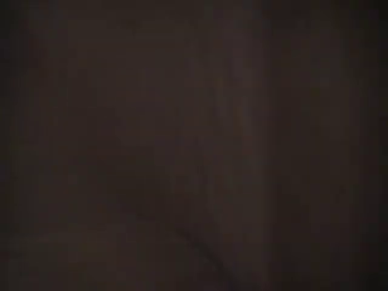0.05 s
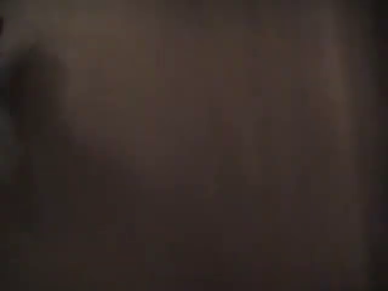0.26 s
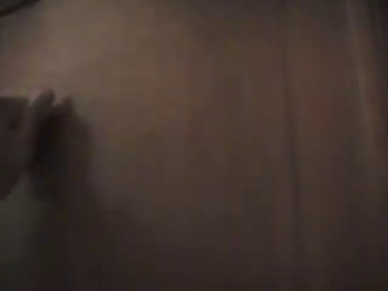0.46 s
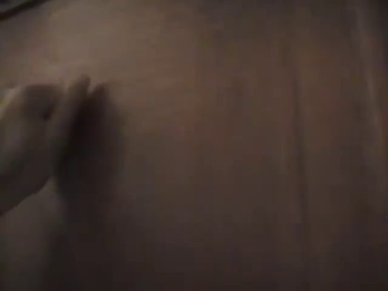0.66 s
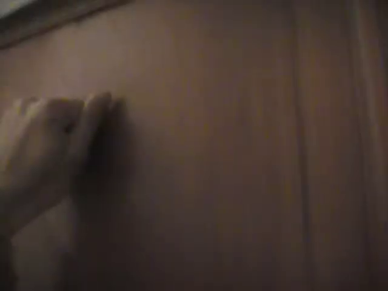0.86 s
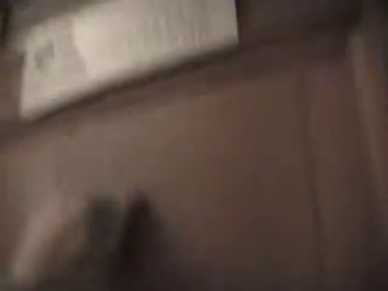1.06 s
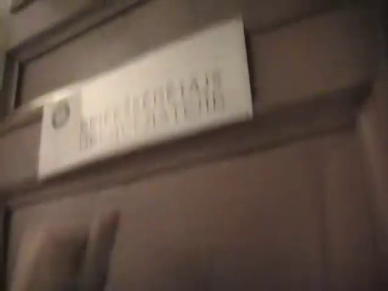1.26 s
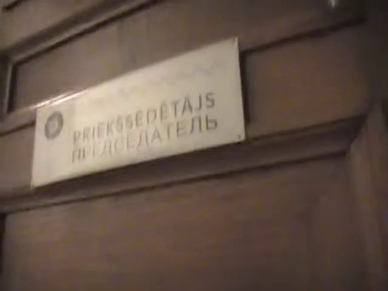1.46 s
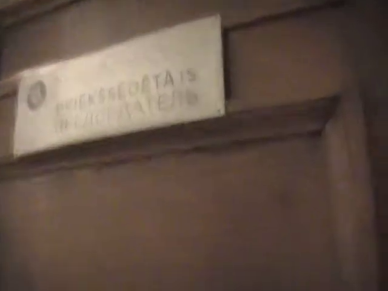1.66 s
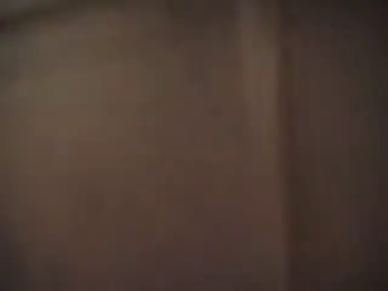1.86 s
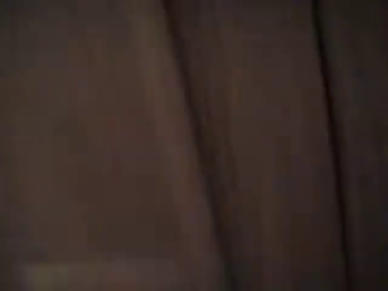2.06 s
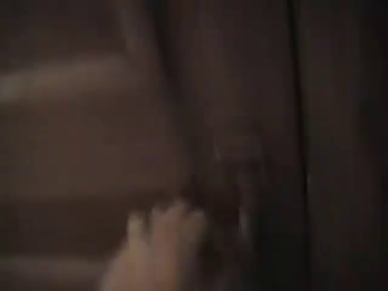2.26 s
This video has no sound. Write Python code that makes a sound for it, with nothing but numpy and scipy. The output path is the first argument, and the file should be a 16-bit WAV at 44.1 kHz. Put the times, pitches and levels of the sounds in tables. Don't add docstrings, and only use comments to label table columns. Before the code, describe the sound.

Five quick, woody knocks ring through a hard corridor, then a short pause with a soft shoe scuff, a sharp handle click, the door bumping in its frame, and a final metallic rattle, heard close with low air noise.

```python
import sys
import numpy as np
from scipy import signal
from scipy.fft import rfft, irfft, next_fast_len
from scipy.io import wavfile
from scipy.ndimage import uniform_filter1d

SR = 44100
rng = np.random.default_rng(int(sys.argv[2]) if len(sys.argv) > 2 else 0)


def voltage_ratio(decibels):
    exponent = np.asarray(decibels, float) / 20
    return 10 ** exponent


def dump(signal):
    limited = np.clip(np.atleast_2d(signal).T, -1, 1)
    pcm = np.round(limited * 32767).astype(np.int16)
    wavfile.write(sys.argv[1], SR, pcm)


N = 101253
PRE = 4410
M = N + PRE
FFT_SIZE = next_fast_len(2 * M)
F = np.fft.rfftfreq(FFT_SIZE, 1 / SR) + 1e-6


def shape(x, gain):
    return irfft(rfft(x, FFT_SIZE) * gain, FFT_SIZE)[..., :M]


def logf(table):
    hz, value = np.array(table, float).T
    return np.interp(np.log(F), np.log(hz), value)


def band(hz, width):
    return 1 / (1 + ((F - hz * hz / F) / width) ** 2)


def unit(x):
    return x / np.sqrt(np.mean(x ** 2))


def smooth_noise(size):
    return unit(uniform_filter1d(rng.standard_normal(M), size=size))


# (frequency [Hz], share of unrelated sound left and right [0-1])
DECORRELATION = [(60, 0.44), (200, 0.15), (500, 0.52), (1500, 0.69), (10000, 1)]


def wide(gain):
    middle, side = rng.standard_normal((2, M))
    side = shape(side, gain * np.clip(logf(DECORRELATION), 0, 1))
    return shape(middle, gain) + side * np.array([[1], [-1]])


def ring(modes, gains, seconds=0.44, damp=0.91):
    detune = 0.021
    hz, db, t60 = np.array(modes, float).T[:, :, None]
    hz = hz * (1 + detune * rng.standard_normal(hz.shape))
    t = np.arange(int(seconds * SR)) / SR
    decay = voltage_ratio(db - 60 * t / (t60 * damp))
    return (np.asarray(gains)[:, None] * decay * np.sin(2 * np.pi * hz * t)).sum(axis=0)


def add(out, s, x):
    i = max(int(round(s * SR)) + PRE, 0)
    x = x[:M - i]
    out[i:i + len(x)] += x


def push(ms):
    u = np.arange(200) / SR * 6000 / ms
    force = u ** 2 * np.exp(-u)
    return force / force.sum()


# (frequency [Hz], density [dB per Hz])
AIR_SPECTRUM = [(25, -8), (60, 1.5), (71, -10), (153, -9.5), (437, -6), (1910, -18.5), (2050, -19),
                (10300, -37), (16000, -52)]
# (time [s], level [dB])
RUMBLE_LEVEL = [(0, -42.5), (.5, -44), (1, -42), (1.5, -49), (1.9, -59), (2.29, -64)]
# (time [s], level [dB])
RUSTLE_LEVEL = [(0, -68), (.1, -62), (.3, -69), (.7, -75), (1.05, -66), (1.3, -59.5), (1.5, -59),
                (1.65, -61.5), (1.82, -58), (2.1, -60.5), (2.29, -62)]


def background():
    rumble_hz, rumble_width_hz, rumble_noise_db = 44, 5.6, -10
    rustle_hz, rustle_width_hz, rustle_db = 10500, 6000, -1.5
    t = (np.arange(M) - PRE) / SR

    def course(table):
        return voltage_ratio(np.interp(t, *np.array(table).T))

    air = unit(wide(voltage_ratio(logf(AIR_SPECTRUM)) * (F > 20))) * voltage_ratio(-51.5)

    drift = 1 + 0.035 * smooth_noise(8000)
    hum = np.sin(2 * np.pi * np.cumsum(rumble_hz * drift) / SR)
    rumble_noise = voltage_ratio(rumble_noise_db) * unit(wide(band(rumble_hz, rumble_width_hz)))
    rumble = (hum + rumble_noise) * course(RUMBLE_LEVEL)

    flicker = voltage_ratio(smooth_noise(1500))
    rustle = unit(wide(band(rustle_hz, rustle_width_hz))) * flicker * voltage_ratio(rustle_db)
    return air + rumble + rustle * course(RUSTLE_LEVEL)


# (centre frequency [Hz], level [dB], decay time t60 [s])
ROOM_BANDS = [(93, -7, 1.15), (219, 0, 1), (600, -5.5, 1.05), (1254, -1.5, 0.96), (2330, -5, 1.06),
              (4000, -10.5, 0.98), (8800, -14.5, 0.43)]


def corridor():
    room_db, early_db, early_t60_s, build_ms = -8, 3.5, 0.062, 1.7
    t = np.arange(M) / SR
    early = voltage_ratio(early_db - 60 * t / early_t60_s)
    centres = np.log(np.array(ROOM_BANDS)[:, 0])
    out = 0
    for k, (hz, db, t60) in enumerate(ROOM_BANDS):
        share = np.interp(np.log(F), centres, np.arange(len(ROOM_BANDS)) == k)
        out = out + voltage_ratio(db) * wide(np.sqrt(share)) * (voltage_ratio(-60 * t / t60) + early)
    build_up = 1 - np.exp(-t * 1000 / build_ms)
    return out * build_up * voltage_ratio(room_db) * 0.03


# (time [s], length [s], level [dB], centre [Hz], width
# [Hz])
RUBS = [(1.412, 0.016, -40.5, 570, 400), (1.435, 0.053, -39, 516, 470), (1.431, 0.048, -49, 3460, 5950),
        (1.44, 0.11, -58, 4170, 900), (1.472, 0.14, -62, 5000, 5100), (1.722, 0.21, -60.5, 4000, 5000),
        (1.88, 0.02, -42, 4900, 6000), (1.8327, 0.002, -40, 10500, 9440), (1.887, 0.14, -51.5, 4940, 8000),
        (1.888, 0.13, -45.5, 720, 487), (2.198, 0.04, -49.5, 10500, 7900), (2.222, 0.11, -48.5, 8400, 7300),
        (2.24, 0.032, -50.5, 4540, 3400), (2.242, 0.069, -56, 10500, 3000)]


def scuffs():
    out, t = np.zeros(M), (np.arange(M) - PRE) / SR
    for s, length, db, hz, width in RUBS:
        grit = voltage_ratio(2.5 * smooth_noise(150))
        u = (t - s) / length
        envelope = np.clip(u * 20, 0, 1) * np.clip(1.5 - u * 1.12, 0, 1)
        out += voltage_ratio(db) * unit(shape(rng.standard_normal(M), band(hz, width))) * grit * envelope
    return out


# (time [s], level [dB], frequency [Hz], decay time t60 [s])
SETTLING = [(.0298, -44, 9500, .003), (.733, -46, 2700, 0.033), (.925, -46, 2700, 0.017),
            (1.886, -26, 777, 0.084), (1.8975, -24, 712, 0.083), (1.898, -28, 274, 0.14),
            (1.908, -25.5, 129, .09), (1.934, -27, 144, .08), (1.935, -33.5, 300, 0.053),
            (1.966, -29, 152, .07), (1.98, -32, 395, .12), (1.996, -30, 177, 0.085),
            (2.02, -37, 741, 0.051), (2.0423, -42, 3500, 0.0092), (2.1533, -49, 6850, 0.011),
            (2.1945, -40, 213, .05), (2.1981, -24, 206, 0.054), (2.225, -37, 280, .08),
            (2.258, -33.5, 216, 0.12)]


def bumps():
    upper_db, lower_db = -11, -12
    out = np.zeros(M)
    for s, db, hz, t60 in SETTLING:
        modes = [(hz, 0, t60), (hz * 1.31, upper_db, t60), (hz * .78, lower_db, t60)]
        add(out, s, voltage_ratio(db) * ring(modes, [1, 1, 1], .2))
    return out


# (frequency [Hz], level [dB], decay time t60 [s])
DOOR_MODES = [(117.8, -4.5, 0.2), (182.6, 2, 0.053), (240, -3.5, 0.065), (295, -9.5, 0.072),
              (386, -8.5, 0.092), (481.4, -3.5, 0.062), (549, -9, 0.077), (650, -2.5, 0.074),
              (774, -3.5, 0.057), (864.5, 1, 0.055), (1180, 1.5, 0.041), (1448, 5, 0.038), (1930, 2, 0.016),
              (2700, -12, 0.012)]


def door_hit(ms, gains, **decay):
    return np.convolve(ring(DOOR_MODES, gains, **decay), push(ms))


# (time [s], level [dB], rattle length [ms], shock into the door [dB])
HANDLE_SNAPS = [
    (1.877, -13, 0.21, -5.5),
    (1.8787, -9.5, 1.44, -11),
    (1.885, -23.5, 3.53, -2),
    (2.2872, -13.5, 1.4, -24),
    (2.2902, -11.5, 5.8, -8),
]
# (frequency [Hz], level [dB], decay time t60 [s])
HANDLE_MODES = [(1600, -11, 0.012), (2350, -5, 0.026), (3250, -9.5, 0.026), (4030, -10.5, 0.029),
                (4900, 1.5, 0.0072), (6400, -3, 0.024), (7660, -21, 0.02), (9840, 0, 0.029),
                (10560, -11, 0.031), (11740, -8, 0.042), (12800, -4, 0.013), (14130, -18, 0.0084)]


def handle():
    metal_damp, held_damp = 0.36, 0.62
    out, t = np.zeros(M), np.arange(900) / SR
    for s, db, ms, door_db in HANDLE_SNAPS:
        hits = -rng.standard_normal(len(t)) ** 3 * np.exp(-t * 1000 / ms)
        hits[0] = -2
        hits = hits / np.sqrt(np.sum(hits ** 2))
        signs = rng.choice([-1., 1.], len(HANDLE_MODES))
        body = 0.37 * ring(HANDLE_MODES, signs, .1, metal_damp)
        body[:2] = 1.5, .9
        add(out, s, voltage_ratio(db) * np.convolve(hits, body))
        shock = door_hit(0.28, np.ones(len(DOOR_MODES)), seconds=.3, damp=held_damp)
        add(out, s, -voltage_ratio(db + door_db) * 0.31 * shock)
    return out


# (time [s], level [dB], contact [ms], favoured panel region [Hz], knuckle crack [dB])
RAPS = [
    (-.045, 7, 0.56, 600, -33),
    (0.1608, 8.5, 0.53, 386, -17.5),
    (0.3871, 4.5, 0.41, 777, -15.5),
    (0.6112, 4, 0.81, 710, -22),
    (0.7987, 5.5, 0.98, 414, -29.5),
    (1.001, 4, 0.63, 587, -22.5),
]
# (frequency [Hz], level [dB])
SECOND_REGION = [(626, 3.5), (1440, 1), (650, 5), (870, 6), (1080, 9.5), (790, 4.5)]
# (frequency [Hz], level [dB],
# treble [dB])
DAMPED_REGION = [(280, -11, 3), (900, -5.5, 8), (393, -11, 5), (373, -8.5, 2), (185, -9, -8),
                 (334, -9.5, 1.5)]


def knocks():
    focus_db, focus_oct, second_oct, damped_oct, treble_hz = 9.5, 0.49, 0.15, 0.6, 1300
    slap_db, far_db, far_damp = -9, 4, 0.32
    crack_hz, crack_width_hz, crack_ms = 2400, 2120, 0.94
    buzz_hz, buzz_width_hz, buzz_ms, buzz_db = 8500, 7800, 16, -32
    panel, far, cracks, buzzes = np.zeros((4, M))
    t = np.arange(2000) / SR
    mode_hz = np.array(DOOR_MODES)[:, 0]

    def near(hz, octaves):
        return np.exp(-(np.log2(mode_hz / hz) / octaves) ** 2)

    for rap, second, damped in zip(RAPS, SECOND_REGION, DAMPED_REGION):
        s, db, ms, focus_hz, crack_db = rap
        second_hz, second_db = second
        damped_hz, damped_db, treble_db = damped
        reach_db = focus_db * (near(focus_hz, focus_oct) - .5)
        reach_db = reach_db + second_db * near(second_hz, second_oct)
        reach_db = reach_db + damped_db * near(damped_hz, damped_oct)
        reach = voltage_ratio(reach_db + treble_db * (mode_hz > treble_hz))
        add(panel, s, voltage_ratio(db) * 0.26 * door_hit(ms, reach))
        add(far, s, voltage_ratio(db + far_db) * 0.29 * door_hit(ms, reach, damp=far_damp))

        force = push(ms)
        slap = np.convolve(force, np.gradient(force))
        add(panel, s, voltage_ratio(db + slap_db) * slap / slap.max())

        noise, u = rng.standard_normal((2, len(t))), t * 1000 / crack_ms
        add(cracks, s, voltage_ratio(db + crack_db) * noise[0] * 2 * u * np.exp(-u))
        add(buzzes, s, voltage_ratio(db + crack_db + buzz_db) * noise[1] * np.exp(-t * 1000 / buzz_ms))
    cracks = shape(cracks, np.sqrt(band(crack_hz, crack_width_hz)))
    return panel, far, cracks + shape(buzzes, band(buzz_hz, buzz_width_hz))


# (frequency [Hz], left minus right [dB])
PORT_LEAN = [(60, 0.5), (300, 1), (600, 1.5), (1200, 0.5), (2500, 1), (14000, 0)]


def heard(dry, wet, bed, ports):
    low_cut_hz, sub_cut_hz, top_hz, top_steep = 141.7, 93.5, 16000, 60
    low_cut = 1 / (1 - 1j * low_cut_hz / F) ** 3
    sub_cut = 1 / (1 - 1j * sub_cut_hz / F - (sub_cut_hz / F) ** 2) ** 2
    sound = shape(dry + wet, low_cut * sub_cut) + bed
    top_cut = 1 / np.sqrt(1 + (F / top_hz) ** top_steep)
    lean, lead = voltage_ratio(logf(PORT_LEAN) / 2), np.exp(.5j * logf(ports))
    return shape(sound, top_cut * np.array([lean * lead, 1 / (lean * lead)]))


# (frequency [Hz], left lead [radians])
DOOR_PHASE = [(60, 0.14), (500, 0.21), (1200, 0.89), (2500, 0.44), (5000, 1.37), (14000, 1.95)]
# (frequency [Hz], left lead [radians])
HANDLE_PHASE = [(60, 0.089), (800, 0.78), (2500, 0.98), (5000, 1.65), (9000, 1.14), (14000, 1.4)]


def scene():
    crack_wet_db, handle_wet_db, bump_wet_db = -16.5, 3.5, -2.5
    bed, hall = background(), corridor()
    hand, thuds = scuffs() + handle(), bumps()
    panel, far, cracks = knocks()

    def echo(x):
        return shape(hall, rfft(x, FFT_SIZE))

    door_wet = echo(far + voltage_ratio(crack_wet_db) * cracks)
    door = heard(panel + cracks, door_wet, bed, DOOR_PHASE)
    hand_wet = echo(voltage_ratio(handle_wet_db) * hand + voltage_ratio(bump_wet_db) * thuds)
    return (door + heard(hand + thuds, hand_wet, np.zeros(M), HANDLE_PHASE))[:, PRE:]


def band_limit(x):
    return signal.sosfilt(signal.butter(12, 16740, fs=SR, output="sos"), x)


def record(dry):
    clip_level, clip_hard = 1.02, 4.2
    x = dry / (1 + np.abs(dry / clip_level) ** clip_hard) ** (1 / clip_hard)
    x = x * np.clip(np.arange(N) / (.0012 * SR), 0, 1)
    return band_limit(x)


dry = scene()
out = record(dry)
dump(out)
```